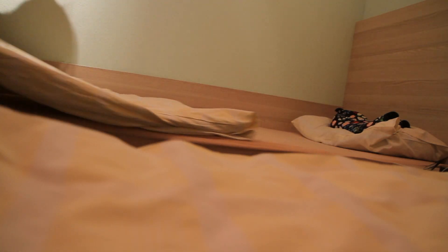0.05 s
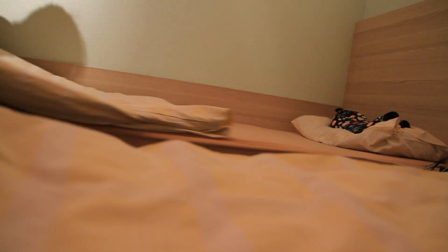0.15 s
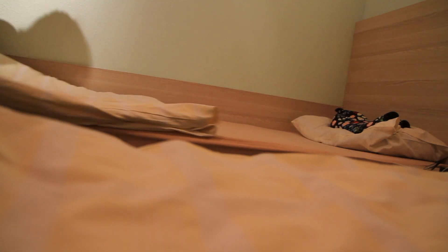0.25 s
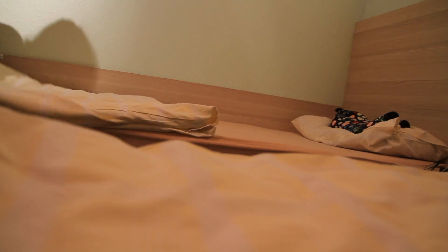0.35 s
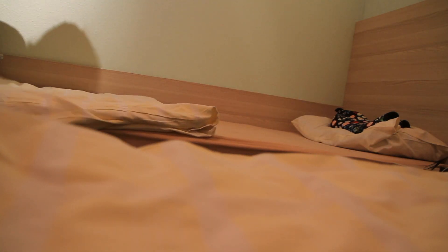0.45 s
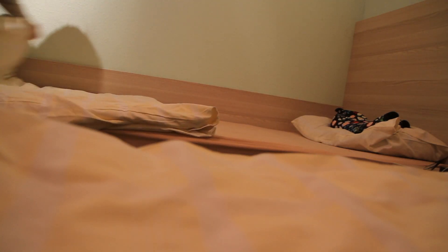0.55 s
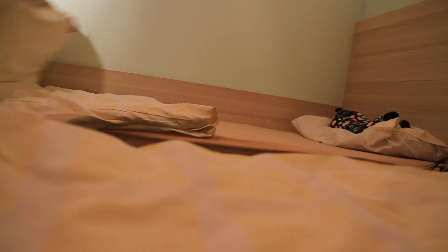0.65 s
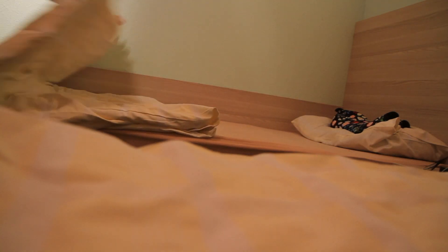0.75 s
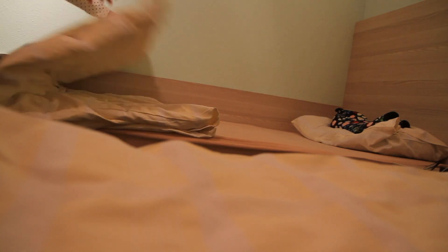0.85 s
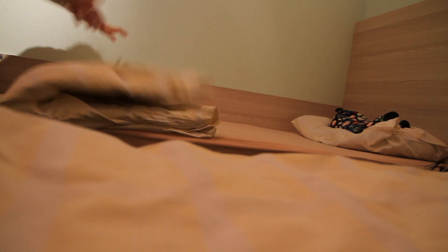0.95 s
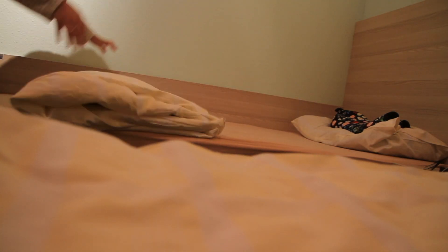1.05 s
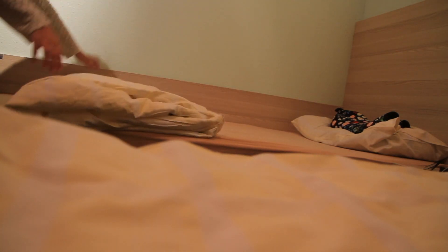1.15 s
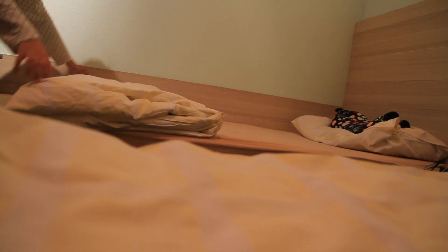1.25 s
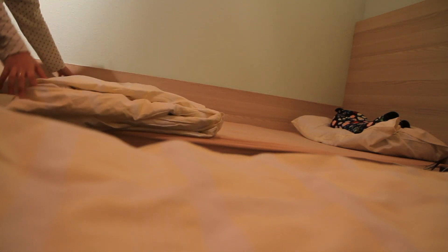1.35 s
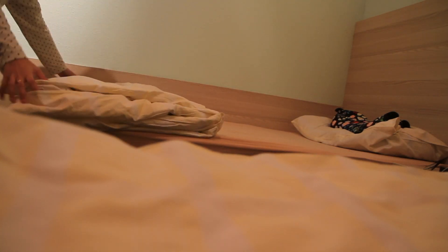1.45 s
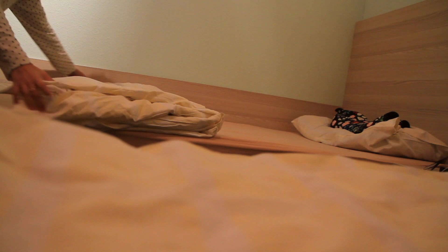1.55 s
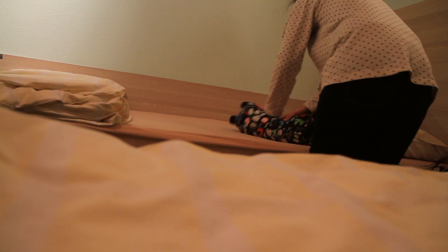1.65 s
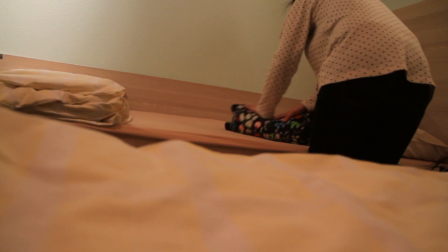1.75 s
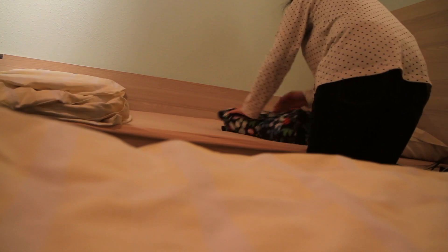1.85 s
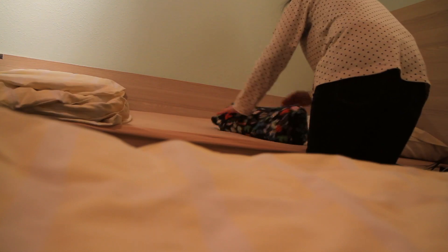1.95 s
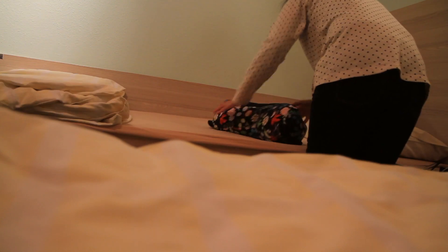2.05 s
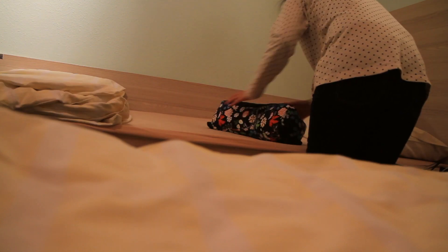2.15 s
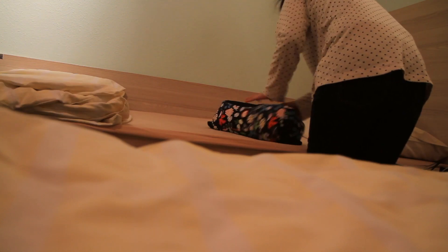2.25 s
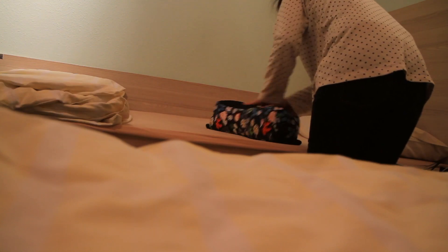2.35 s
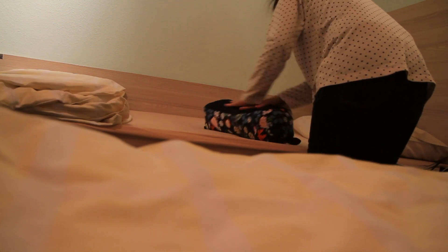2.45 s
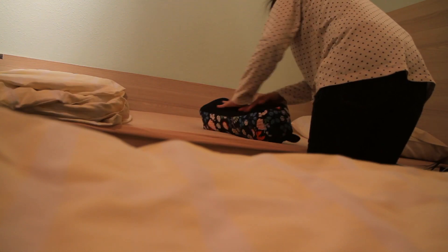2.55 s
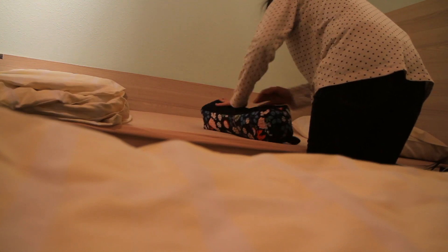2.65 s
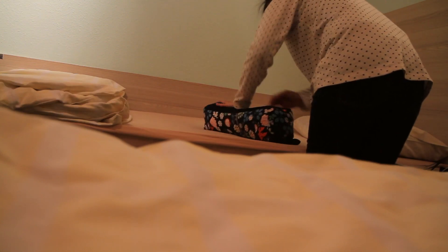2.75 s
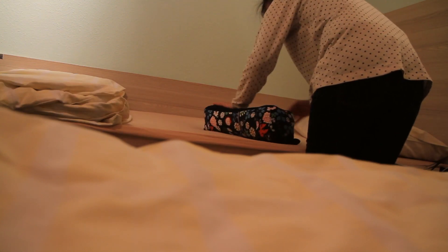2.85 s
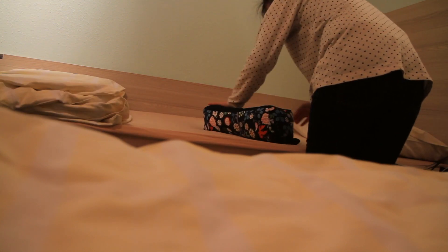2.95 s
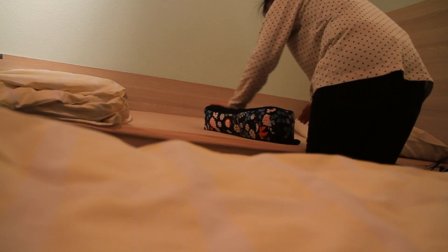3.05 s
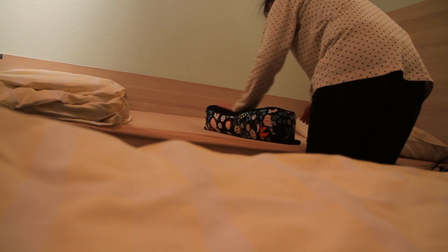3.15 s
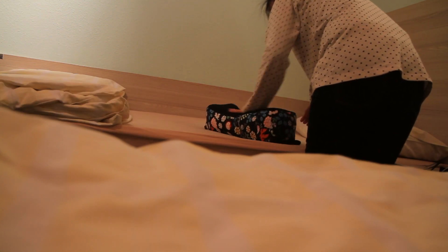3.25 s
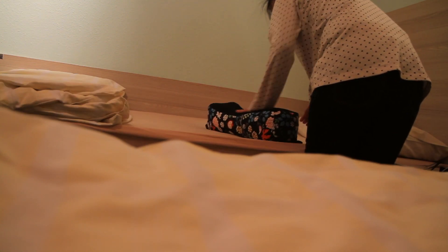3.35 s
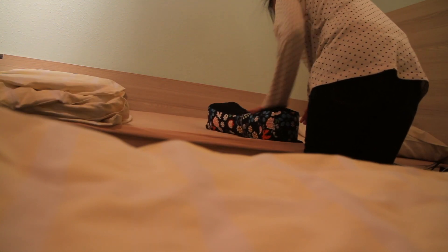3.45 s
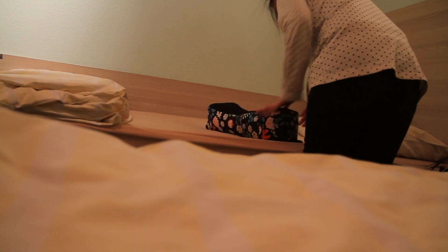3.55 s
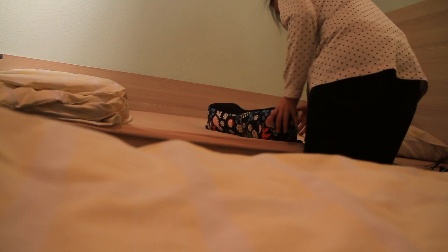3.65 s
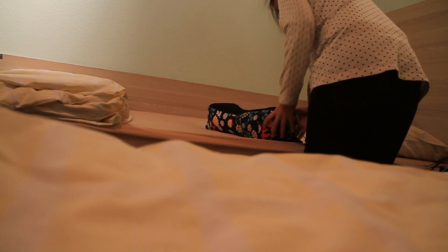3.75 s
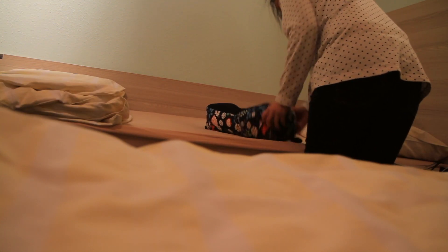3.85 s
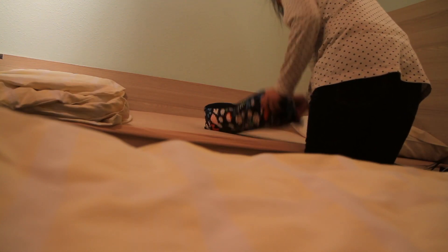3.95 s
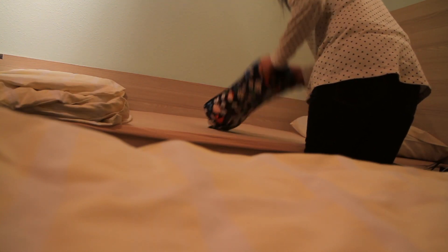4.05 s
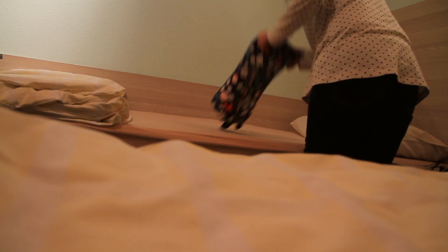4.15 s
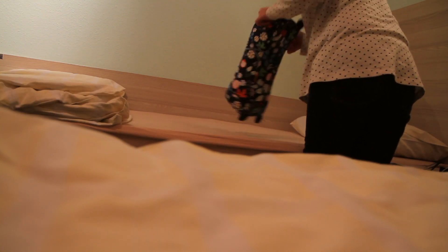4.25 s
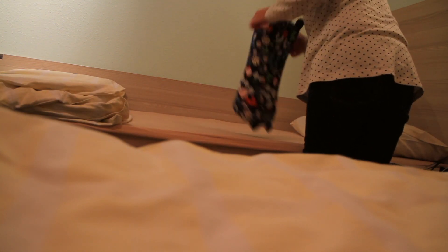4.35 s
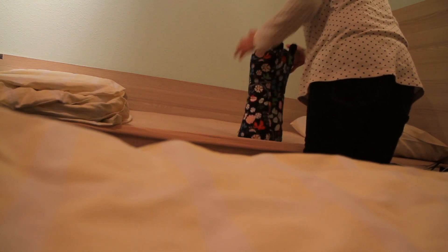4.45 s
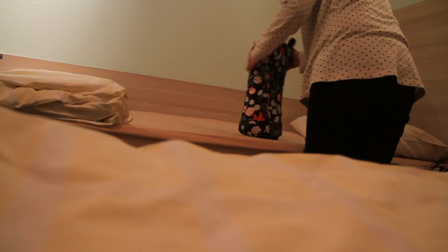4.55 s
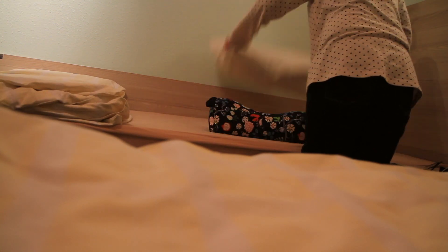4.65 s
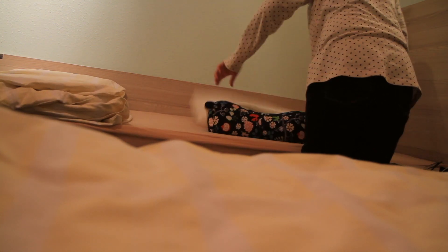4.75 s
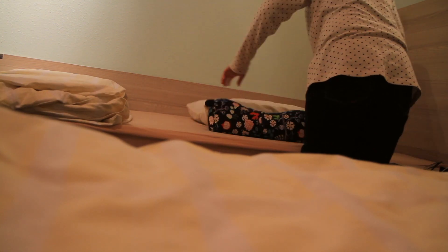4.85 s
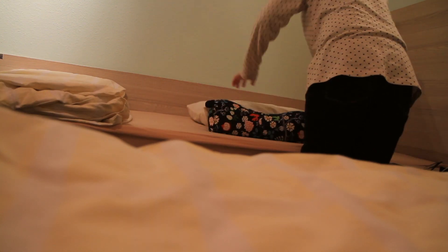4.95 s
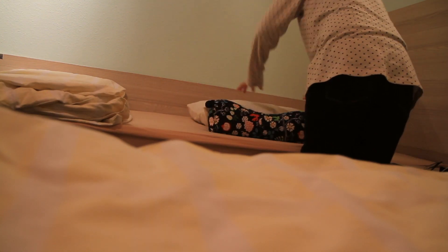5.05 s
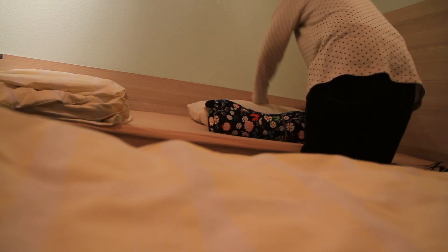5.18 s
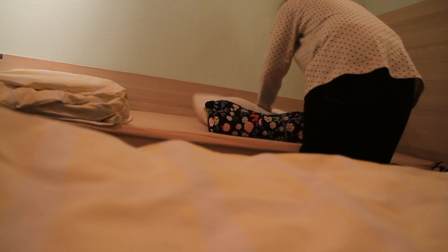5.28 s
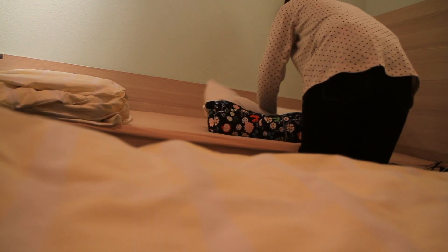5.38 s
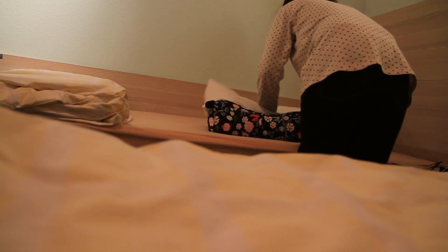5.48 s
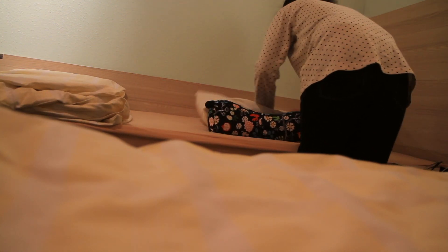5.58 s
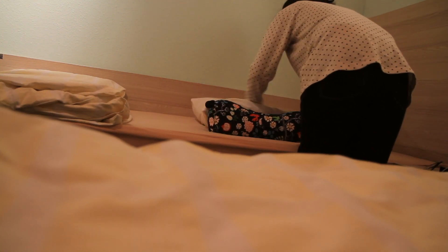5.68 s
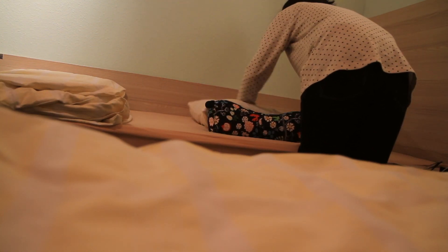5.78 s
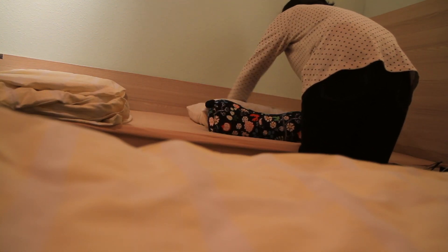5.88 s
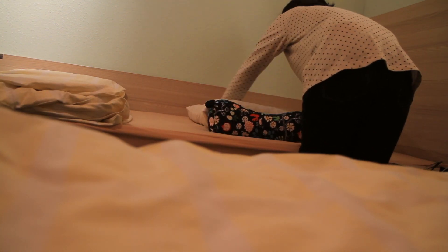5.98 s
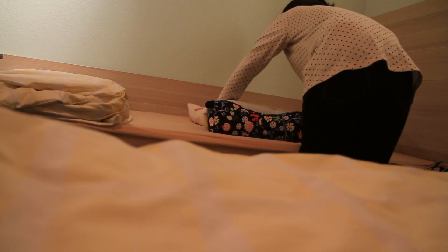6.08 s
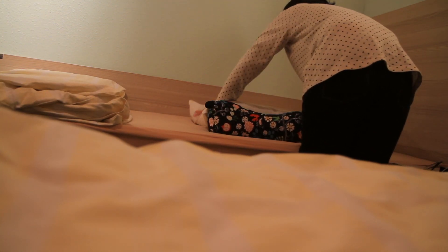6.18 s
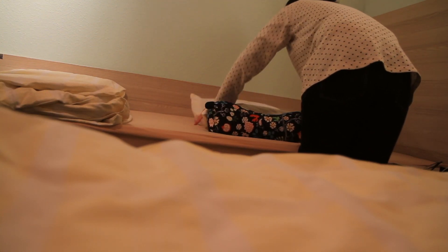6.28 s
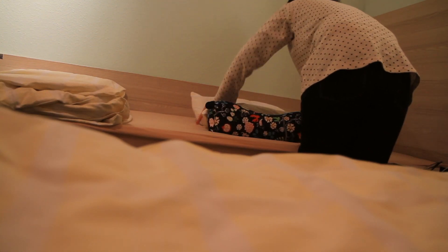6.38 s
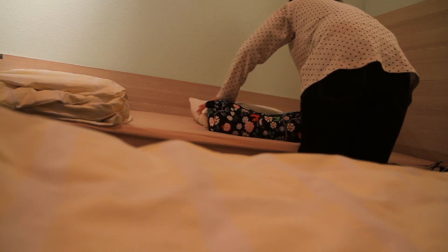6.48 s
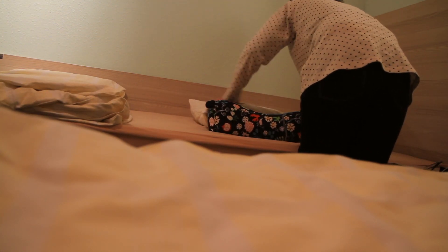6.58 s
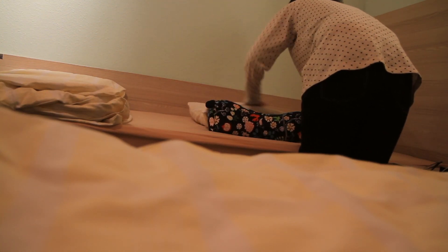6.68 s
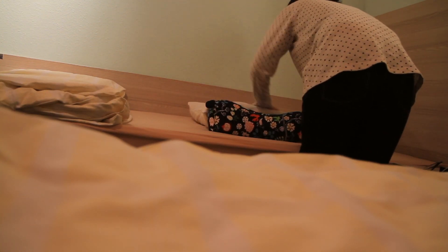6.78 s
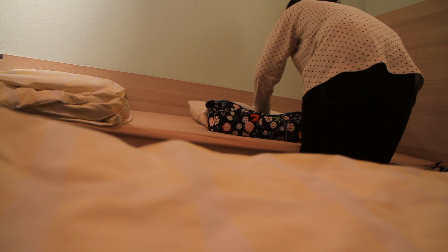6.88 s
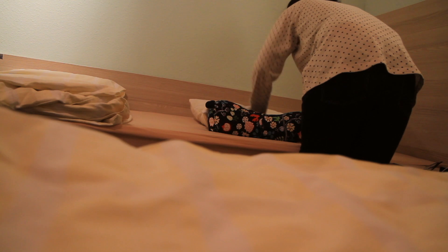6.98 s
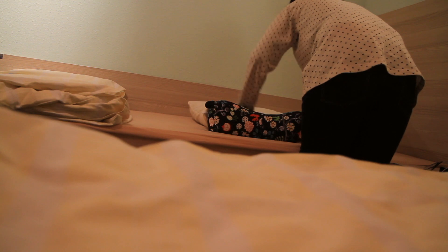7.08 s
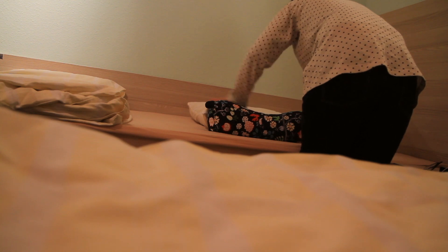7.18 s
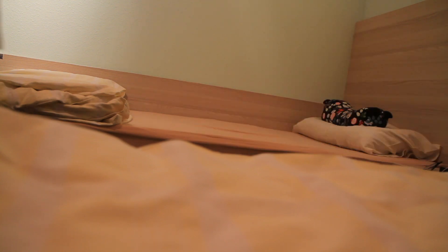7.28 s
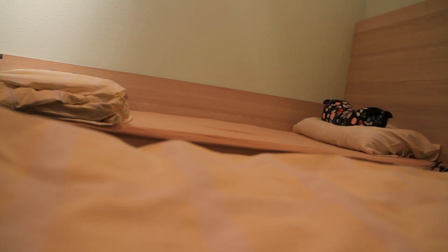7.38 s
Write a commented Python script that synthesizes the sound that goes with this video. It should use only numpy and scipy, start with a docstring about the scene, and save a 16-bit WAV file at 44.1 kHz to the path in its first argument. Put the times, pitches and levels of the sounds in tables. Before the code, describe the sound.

A quiet, small bedroom is heard from the bed, with a steady low hum, light hiss, faint irregular pips and a very thin high whine. Cloth slides briefly at the start. At 0.7 seconds a quilt swishes with a low flutter, and it lands with a soft, puffy thud at 1 second. From 1.5 to 4.3 seconds hands rub and shift fabric in overlapping, gently hissing strokes, with a tiny sharp snap near 4.1. Cloth crinkles in a grip around 4.5 seconds, followed by another tick. At 4.8 a cloth bundle lands on a pillow with a full, dull thump, a crackle of folds and a slight wooden knock, by far the loudest sound. A lighter thump follows at 5.2. From 5.7 until about 7.3 seconds, brighter smoothing strokes continue with a few soft, airy pats. The room adds only a very short echo.

```python
"""Laying out bedding

In a small bedroom a quilt is folded over, a pillow and a cloth bundle drop on the bed, and hands smooth
the covers in long strokes. Friction between fibres hisses, collapsing folds crackle, and soft impacts
thud into the low modes of bed and room, over a quiet hum with faint pips and a thin high whine."""
import sys
import numpy as np
from scipy import signal
from scipy.fft import rfft, irfft
from scipy.io import wavfile
from scipy.ndimage import uniform_filter1d

SR = 44100
rng = np.random.default_rng(int(sys.argv[2]) if len(sys.argv) > 2 else 0)


def generate_wav(sig):
    """Save sig (samples, or channels by samples) to the path in sys.argv[1] as 16-bit PCM at SR."""
    pcm = np.round(np.clip(np.atleast_2d(sig).T, -1, 1) * 32767).astype(np.int16)
    wavfile.write(sys.argv[1], SR, pcm)


N = 327177
TIME = np.arange(N) / SR


def undb(db):
    """Amplitude ratio of a level in decibels."""
    return 10 ** (np.asarray(db) / 20)


def unit(x):
    """Normalisation to an rms of 1."""
    return x / np.sqrt(np.mean(x ** 2))


def colour(x, spectrum):
    """Spectral shaping by (frequency [Hz], gain [dB]) points, normalised to an rms of 1."""
    hz, db = np.transpose(spectrum)
    bins = np.maximum(np.fft.rfftfreq(N, 1 / SR), 1)
    gain = undb(np.interp(np.log(bins), np.log(hz), db))
    return unit(irfft(rfft(x) * gain, N))


def drift(rate):
    """Low-pass noise: a smooth fluctuation of rms 1 that turns about `rate` times a second."""
    span = max(int(SR / rate), 1)
    smoothed = uniform_filter1d(rng.standard_normal(N), span, mode="wrap")
    return unit(uniform_filter1d(smoothed, span, mode="wrap"))


def snags(rate, spread_db):
    """Shot noise: threads catch and let go in random impulses of uneven size, `rate` a second."""
    clicks = (rng.random(N) < rate / SR) * rng.standard_normal(N)
    return clicks * undb(spread_db * rng.standard_normal(N))


def noise_band(hz, width_hz):
    """Band-limited noise: white noise passes twice through one resonance."""
    b, a = signal.iirpeak(hz, hz / width_hz, fs=SR)
    return signal.lfilter(b, a, signal.lfilter(b, a, rng.standard_normal(N)))


def swell(peak_s, rise_s, fall_s):
    """Transient envelope: a Gaussian rise to the peak, then exponential decay."""
    t = TIME - peak_s
    return np.exp(-(np.minimum(t, 0) / rise_s) ** 2 - np.maximum(t, 0) / fall_s)


# Strokes of hand or cloth over cloth (start [s], acceleration time [s], deceleration time [s],
# relative level [dB], fibre offset [dB], padding offset [dB])
STROKES = [ (-0.15, .35, .1, -50.5, -4, -4), (0.5, .025, 0.28, -63, -2, -3),
           (0.665, 0.043, 0.1, -54, -1, -3.5), (1.22, 0.088, 0.71, -65, 1.5, -7),
           (1.55, 0.063, 0.14, -54.5, -3.5, -8), (1.66, 0.13, 0.22, -49.5, -6, -0.5),
           (1.84, 0.11, 0.094, -50, -1.5, -7), (1.98, 0.066, 0.18, -61.5, -5, 4.5),
           (2.219, 0.013, 0.056, -48, -6.5, -2), (2.25, 0.044, 0.087, -50.5, -9, -1),
           (2.35, 0.092, 0.24, -48.5, -3, -5), (2.63, .29, .1, -50, 0, -5.5),
           (3.06, 0.11, 0.14, -47, -2.5, -3.5), (3.17, 0.11, 0.11, -47, -4, -5),
           (3.35, 0.09, 0.11, -47, 1, -1.5), (3.46, 0.12, 0.062, -48.5, -2, -14),
           (3.705, 0.045, 0.072, -55.5, -0.5, -2), (3.77, 0.096, 0.29, -49, -6.5, -3),
           (4.03, 0.063, 0.091, -45.5, -6.5, -9.5), (4.14, 0.047, 0.15, -49.5, -3.5, -3.5),
           (4.6, 0.12, 0.026, -51, -4, -11), (5.18, 0.17, 0.19, -51.5, -3, -2.5),
           (5.47, 0.11, 0.23, -58.5, -4, 0), (5.706, 0.022, .14, -50.5, 1, -5.5),
           (5.79, 0.1, 0.16, -47, 1.3, -7.5), (5.98, .1, 0.11, -50.5, 2, -7),
           (6.09, 0.14, 0.18, -47, 0.6, -4.5), (6.32, 0.07, 0.18, -51, -0.5, -5.5),
           (6.575, .09, 0.3, -51, 0.3, -3), (6.86, 0.13, 0.12, -48.5, 1, -5.5),
           (7.03, 0.094, 0.19, -48, -2.5, -11), ]
# Spectra of the weave, the finest fibres and the padding (frequency [Hz], relative density [dB])
WEAVE_SPECTRUM = [(300, -13), (760, -7), (1400, -1), (1800, -1.5), (2800, -0.5), (3600, -3.5), (4800, -3),
                  (7000, -10.5), (10000, -14), (16000, -31)]
FIBRE_SPECTRUM = [(3000, -13), (6000, -4), (8500, -5), (10500, -3.5), (12600, -0.5), (14200, -4.5),
                  (15700, -9)]
PADDING_SPECTRUM = [(40, -28), (70, -0.5), (110, -3), (210, 1), (290, -1), (350, -3), (490, 0.5), (700, -6),
                    (810, -1), (1400, -16.5), (3000, -34)]


def sliding_cloth(speed_exponent=0.53, fibre_exponent=0.55, settle_s=0.0074):
    """Stick-slip friction: snagging threads excite the cloth, with amplitude a power of sliding speed."""
    power = np.zeros((3, N))
    for start, rise, fall, db, fibre_db, padding_db in STROKES:
        ramp = np.interp(TIME, [start, start + rise, start + rise + fall], [0, 1, 0])
        speed = np.sin(np.pi / 2 * ramp)
        rub = undb(db) * speed ** speed_exponent
        fibre_rub = undb(db + fibre_db) * speed ** fibre_exponent
        power += np.array([rub, fibre_rub, undb(padding_db) * rub]) ** 2
    # the cloth goes on settling after the hand slows
    pole = np.exp(-1 / (settle_s * SR))
    weave, fibres, padding = np.sqrt(signal.lfilter([1 - pole], [1, -pole], power + 1e-18))
    weave *= undb(1.5) * colour(snags(rate=16000, spread_db=1.0), WEAVE_SPECTRUM)
    fibres *= undb(2.5) * colour(snags(rate=28000, spread_db=1.2), FIBRE_SPECTRUM)
    padding *= undb(0.5) * colour(snags(rate=3000, spread_db=0.0), PADDING_SPECTRUM)
    uneven_hand = undb(0.5 * drift(rate=25))
    return (weave + fibres + padding) * uneven_hand


# Spectrum of still air and microphone hiss (frequency [Hz], relative density [dB])
AIR_SPECTRUM = [(40, -11), (75, -3), (150, 0.5), (220, -5), (290, -2.5), (400, -7.5), (530, -10),
                (620, -6.5), (780, -18.5), (1160, -7.5), (1850, -15.5), (2800, -15), (9000, -22),
                (15700, -23.5)]
# A weak low tone and a thin whine (frequency [Hz], rms level [dB])
TONES = [(398.4, -66.5), (15682, -71)]


def background(air_db=-51):
    """Noise floor: slowly drifting broadband hum and hiss, superposed on steady pure tones."""
    air = undb(air_db + 0.28 * drift(rate=0.86)) * colour(rng.standard_normal(N), AIR_SPECTRUM)
    tones = sum(np.sqrt(2) * undb(db) * np.sin(2 * np.pi * hz * TIME) for hz, db in TONES)
    return air + tones


# The clearest of the faint pips in the room (time [s], level [dB])
PIPS = [(.127, -47), (.347, -48), (0.52, -51), (0.638, -47), (.892, -47), (1.151, -49.5), (1.407, -52),
        (1.459, -46), (2.138, -47.5), (4.933, -48.5), (5.271, -45), (5.395, -49), (6.406, -47.5)]


def pips(rise_s=0.0059, fall_s=0.0067, weak_per_s=5, weak_db=-51.5):
    """Amplitude modulation: brief envelopes cut narrow-band noise into pips, the weaker at random."""
    weak = [(s, weak_db) for s in rng.uniform(0, N / SR, int(weak_per_s * N / SR))]
    times, levels = np.transpose(PIPS + weak)
    onsets = ((times - rise_s) * SR).clip(0).astype(int)
    impulses = np.bincount(onsets, undb(levels), N)
    envelope = signal.fftconvolve(impulses, swell(2 * rise_s, rise_s, fall_s)[:SR // 10])[:N]
    return envelope * unit(noise_band(hz=1130, width_hz=260))


# Resonances of the quilt's flutter and swish (frequency [Hz], bandwidth [Hz], relative gain [dB])
QUILT_BANDS = [(153, 79, 1.5), (475, 420, -17), (2190, 1300, -17), (5400, 800, -21)]


def swung_quilt(level_db=-42):
    """Aerodynamic noise: the quilt flutters and swishes through the air, loudest at greatest speed."""
    air = sum(undb(db) * noise_band(hz, width) for hz, width, db in QUILT_BANDS)
    return undb(level_db) * swell(peak_s=0.703, rise_s=0.051, fall_s=0.076) * unit(air)


# Cloth crushed in a grip or a landing
# (time [s], crackle level [dB], puff level [dB], hiss level [dB], decay time [s])
CRUSHES = [(1.004, -50, -44, -62, 0.011), (1.026, -48, -42.5, -57, 0.042), (2.685, -66, -51.5, -70, 0.041),
           (4.466, -39.5, -45, -43.5, 0.052), (4.579, -42, -47, -49, 0.038), (4.753, -42, -61, -49, .013),
           (4.794, -27.5, -22, -43, 0.032), (5.199, -42, -41, -59, 0.018), (5.735, -48, -45, -56, 0.038),
           (6.825, -69, -44.5, -66, 0.036), (7.11, -69, -50.5, -66, 0.064)]
# Spectra of collapsing folds and of expelled air (frequency [Hz], relative density [dB])
CRACKLE_SPECTRUM = [(150, -2.5), (500, -1), (950, 0.5), (1150, -4), (1550, -.5), (1900, -5), (2400, -3),
                    (3500, -9), (5500, -14), (8500, -27.5), (12500, -33), (16000, -40)]
PUFF_SPECTRUM = [(30, -42), (45, -22), (70, -2.5), (112, 0), (150, 0.5), (195, -5.5), (320, -10.5),
                 (480, -14), (800, -40), (2000, -47)]


def crushed_cloth(rise_share=0.74):
    """Buckling and air displacement: folds collapse with crackle and hiss as the stuffing puffs air."""
    crackle, puff, hiss = sum(np.outer(undb(levels), swell(s, rise_share * fall, fall))
                              for s, *levels, fall in CRUSHES)
    crackle *= colour(snags(rate=8000, spread_db=5.0), CRACKLE_SPECTRUM)
    puff *= colour(rng.standard_normal(N), PUFF_SPECTRUM)
    hiss *= colour(rng.standard_normal(N), FIBRE_SPECTRUM)
    return crackle + puff + hiss


def ring(t, hz, t60):
    """Damped oscillation: a mode struck at t = 0 decays by 60 dB in t60 seconds."""
    t = np.maximum(t, 0)
    return np.sin(2 * np.pi * hz * t) * np.exp(-np.log(1000) * t / t60)


def soft_push(peak_s, contact_ms):
    """Compliant contact: a Gaussian force pulse, duller the longer the contact lasts."""
    half_width_s = contact_ms / 2000
    return np.exp(-2 * ((TIME - peak_s) / half_width_s) ** 2)


def landing_force(s, contact_ms, lead_s, gap_s, edge_db=0.1, rebound_db=-8, softening=1.8):
    """Inelastic impact: an edge touches first, then the bulk lands with two weaker, softer rebounds."""
    edge = undb(edge_db) * soft_push(s - lead_s, contact_ms)
    bulk = sum(undb(k * rebound_db) * soft_push(s + k * gap_s, contact_ms * softening ** k)
               for k in range(3))
    return edge + bulk


# Soft loads landing on the mattress
# (time [s], level [dB], contact time [ms], lead of the first edge [s], rebound interval [s])
LANDINGS = [(1.0283, -32.5, 3.8, 0.01045, 0.019), (4.7873, -10, 2.13, 0.01523, .0245),
            (5.213, -25.5, 3.6, 0.0182, 0.0208)]
# Spectrum of shifting stuffing (frequency [Hz], relative density [dB])
STUFFING_SPECTRUM = [(45, -22), (72, -2), (115, -11), (150, 0), (195, 3), (260, 5), (340, -14), (480, -3),
                     (650, -14), (1400, -35)]
# Normal modes of bed and room (frequency [Hz], relative level [dB], 60 dB decay time [s])
BED_MODES = [(72.3, -3.5, 0.32), (117.6, -14, 0.66), (196.6, 5.5, .19), (241, 2, 0.15), (273, 5, 0.22),
             (310.6, 7, 0.32), (384.4, -5, 0.28), (460, 13.5, 0.13), (669, 13, 0.32), (1000, 0, .16)]
# Hollow knocks of the wooden frame (time [s], frequency [Hz], level [dB], 60 dB decay time [s])
FRAME_KNOCKS = [(1.019, 525, -35, 0.055), (4.7445, 520, -31.5, .07), (5.196, 602, -39.5, 0.22)]


def thuds(stuffing_db=-22, coupling_db=-53):
    """Modal excitation: each landing rings bed and room, while stuffing rumbles and the frame knocks."""
    force = sum(undb(db) * landing_force(s, ms, lead, gap) for s, db, ms, lead, gap in LANDINGS)
    shifting = sum(undb(db + stuffing_db) * swell(s - lead, rise_s=0.016, fall_s=0.045)
                   for s, db, _, lead, _ in LANDINGS)
    stuffing = shifting * colour(snags(rate=2700, spread_db=2.0), STUFFING_SPECTRUM)
    modes = sum(undb(db) * ring(TIME[:SR // 2], hz, t60) for hz, db, t60 in BED_MODES)
    ringing = undb(coupling_db) * signal.fftconvolve(force, modes)[:N]
    # a small soft body radiates little deep bass
    direct = signal.sosfilt(signal.butter(2, 105, "highpass", fs=SR, output="sos"), force)
    knocks = sum(undb(db) * ring(TIME - s, hz, t60) for s, hz, db, t60 in FRAME_KNOCKS)
    return direct + ringing + stuffing + knocks


# Single threads and seams snapping (time [s], level [dB])
THREAD_SNAPS = [(3.803, -45), (4.147, -30), (4.694, -34)]


def thread_snaps(fall_s=0.00043):
    """Sudden release of tension: a thread snaps free in a very short broadband burst."""
    envelope = sum(undb(db) * swell(s, fall_s / 2, fall_s) for s, db in THREAD_SNAPS)
    return envelope * rng.standard_normal(N)


def room(x, t60, wet_db):
    """Reverberation: the direct sound plus the short diffuse tail of a small, padded room."""
    t = TIME[:SR // 2]
    tail = rng.standard_normal(len(t)) * np.exp(-np.log(1000) * t / t60) * (t > 0.004)
    return x + undb(wet_db) * signal.fftconvolve(x, tail / np.linalg.norm(tail))[:N]


def scene():
    """Superposition: all sources add at one point on the bed, the same in both channels."""
    light_sounds = sliding_cloth() + crushed_cloth() + swung_quilt() + thread_snaps() + pips()
    mono = room(light_sounds, t60=0.32, wet_db=-10.0)
    mono += room(thuds(), t60=0.46, wet_db=-13.5)
    mono += background()
    return np.array([mono, mono])


def record(dry, low_hz=58, top_hz=15750):
    """Band limiting: a high-pass filter cuts rumble and a steep low-pass cuts the highest treble."""
    highpass = signal.butter(3, low_hz, "highpass", fs=SR, output="sos")
    lowpass = signal.ellip(12, 0.1, 80, top_hz, fs=SR, output="sos")
    return signal.sosfilt(lowpass, signal.sosfilt(highpass, dry))


dry = scene()
out = record(dry)
generate_wav(out)
```